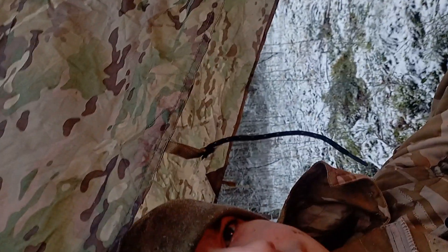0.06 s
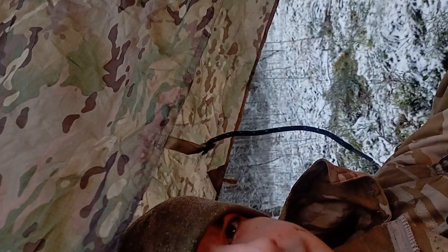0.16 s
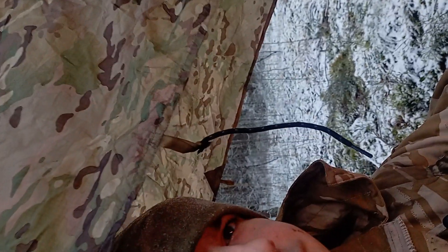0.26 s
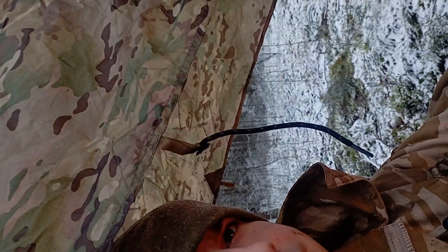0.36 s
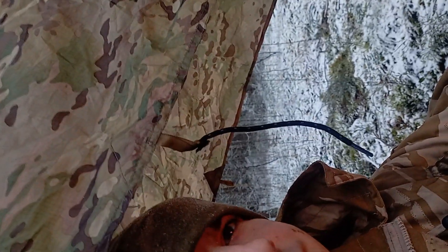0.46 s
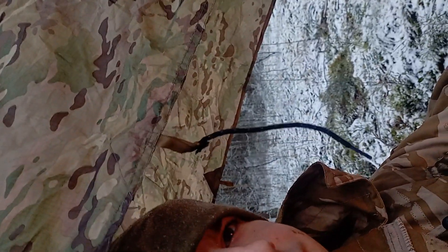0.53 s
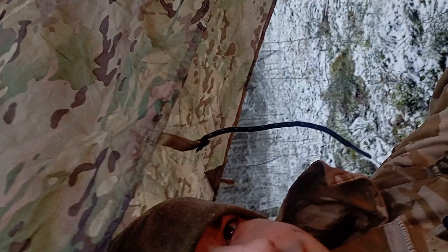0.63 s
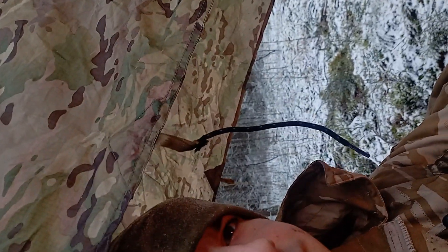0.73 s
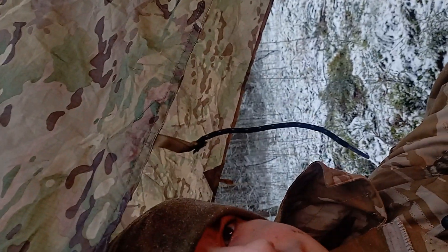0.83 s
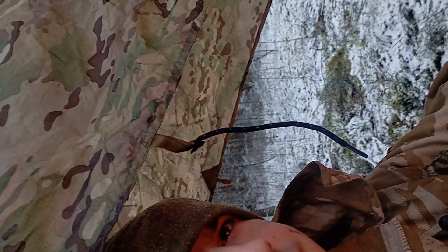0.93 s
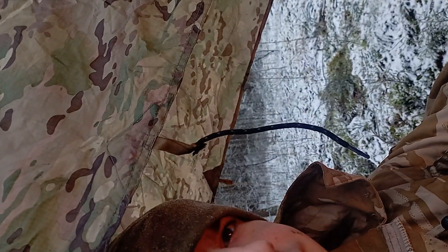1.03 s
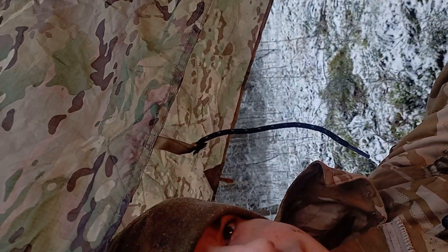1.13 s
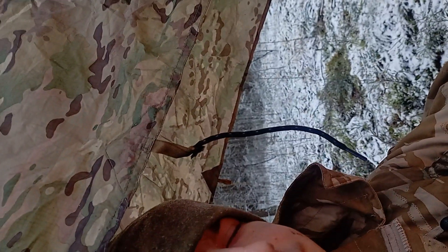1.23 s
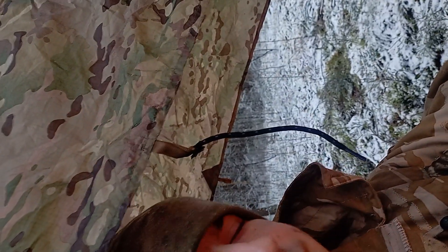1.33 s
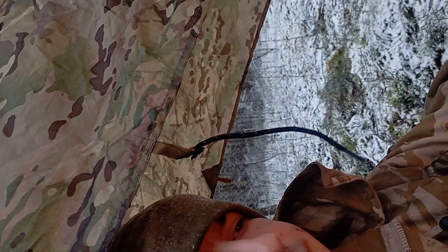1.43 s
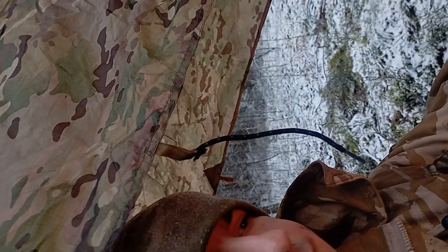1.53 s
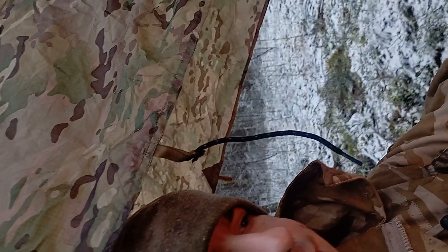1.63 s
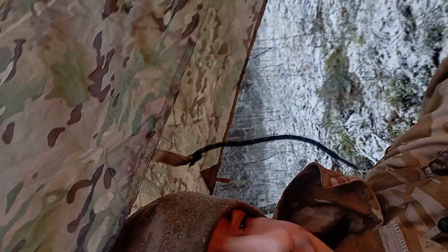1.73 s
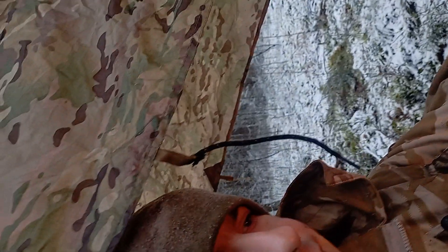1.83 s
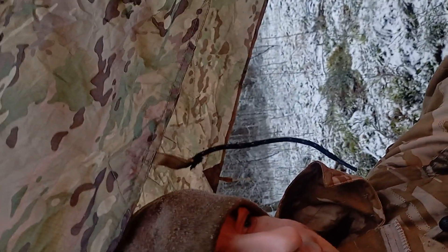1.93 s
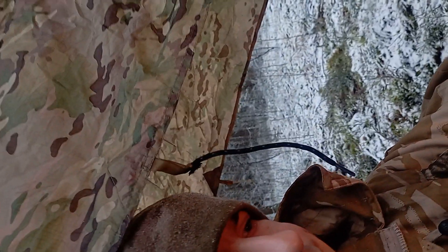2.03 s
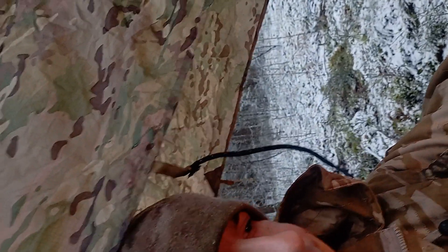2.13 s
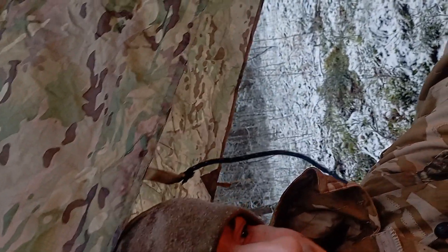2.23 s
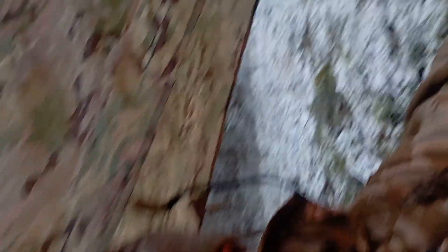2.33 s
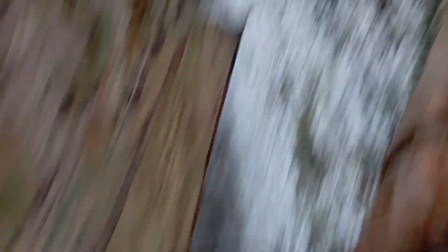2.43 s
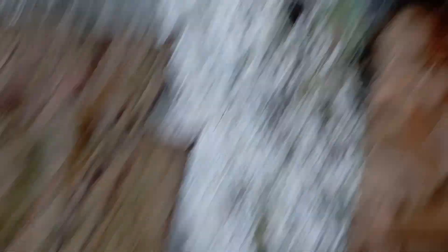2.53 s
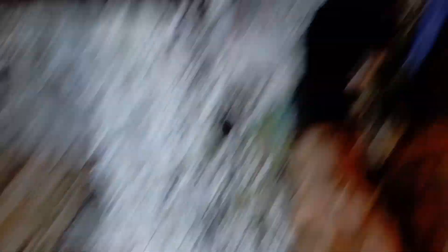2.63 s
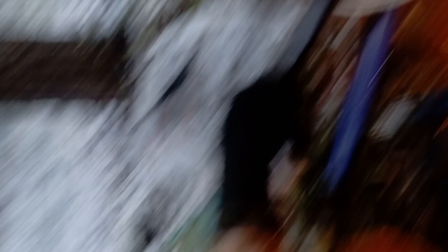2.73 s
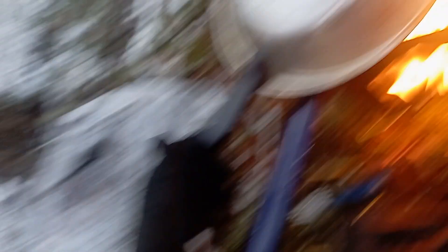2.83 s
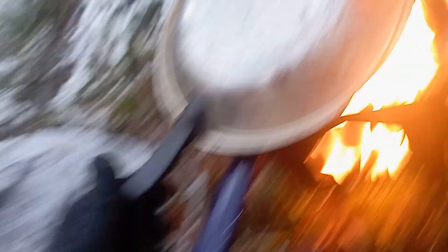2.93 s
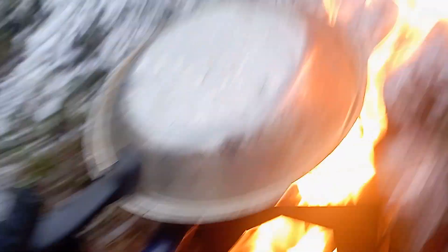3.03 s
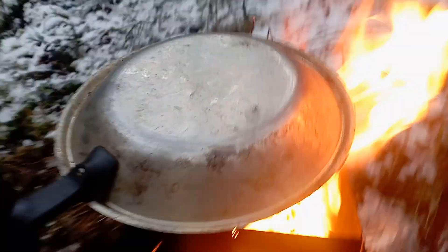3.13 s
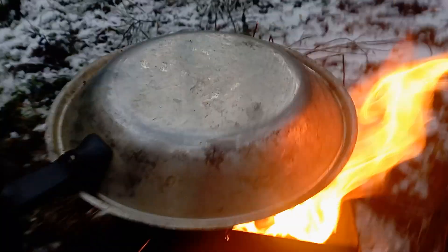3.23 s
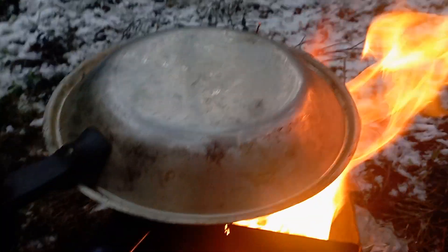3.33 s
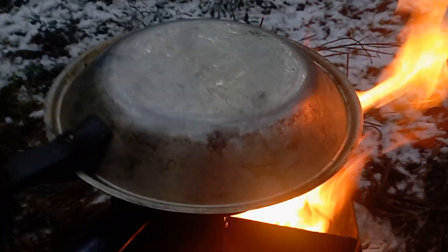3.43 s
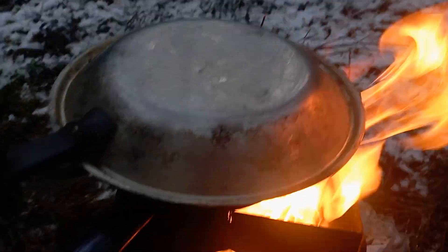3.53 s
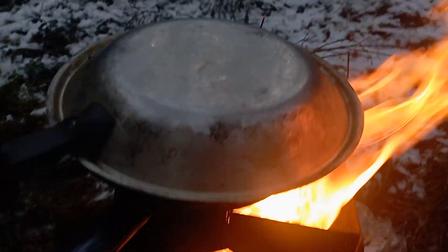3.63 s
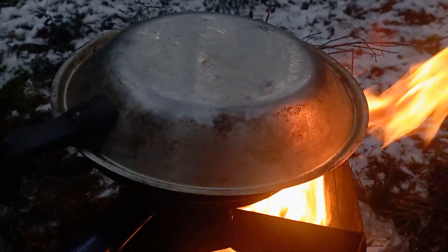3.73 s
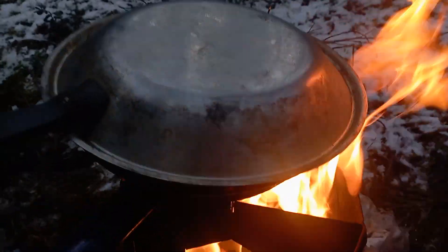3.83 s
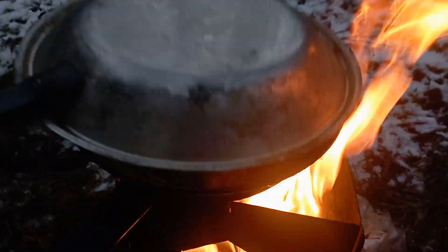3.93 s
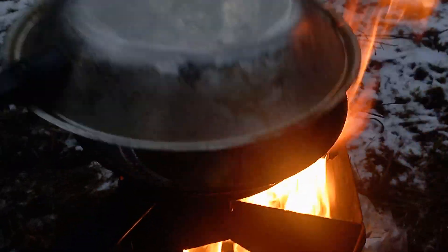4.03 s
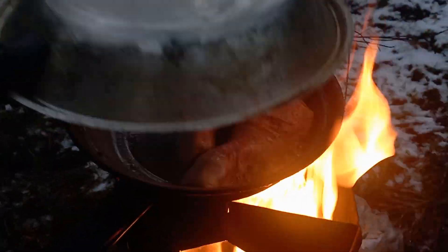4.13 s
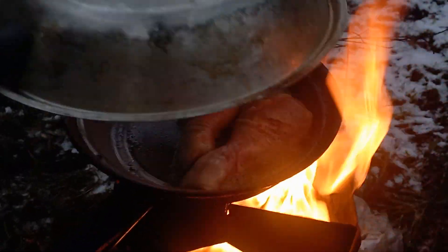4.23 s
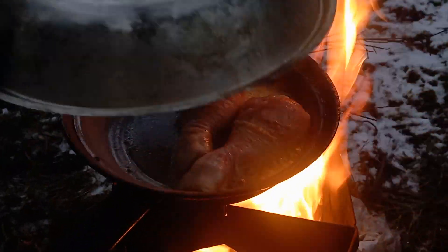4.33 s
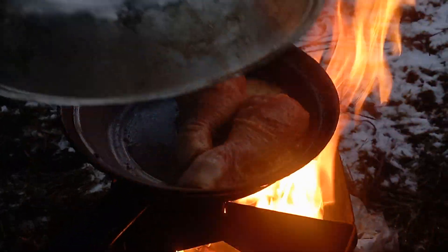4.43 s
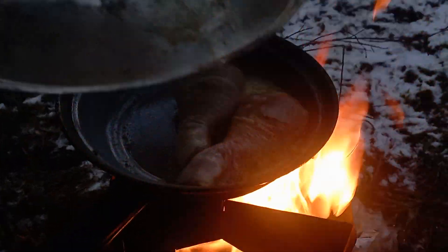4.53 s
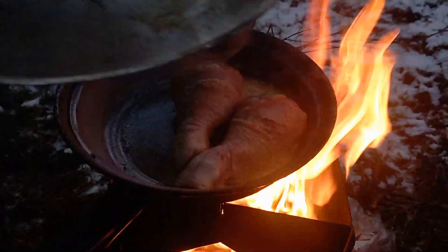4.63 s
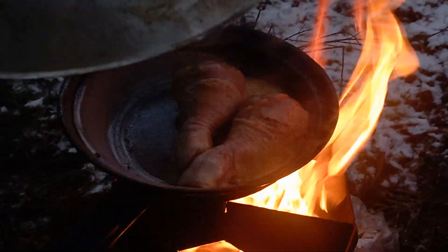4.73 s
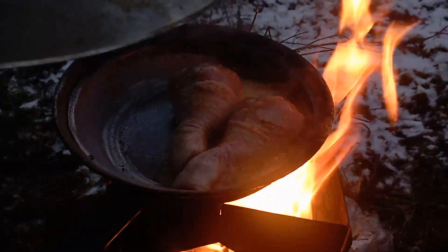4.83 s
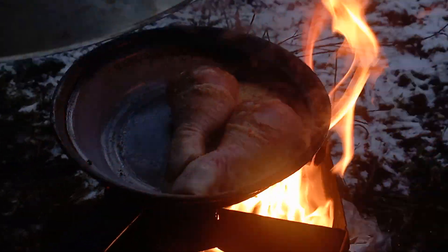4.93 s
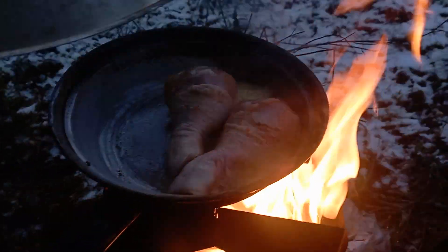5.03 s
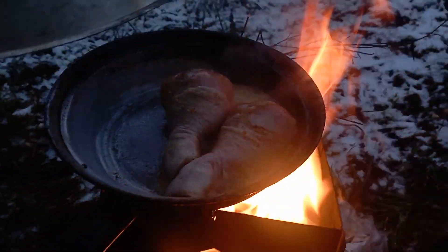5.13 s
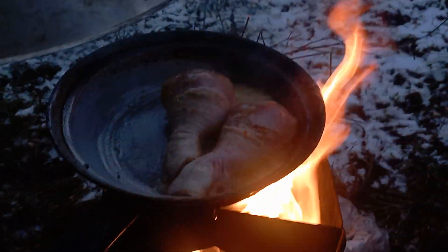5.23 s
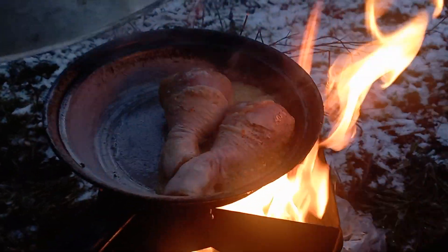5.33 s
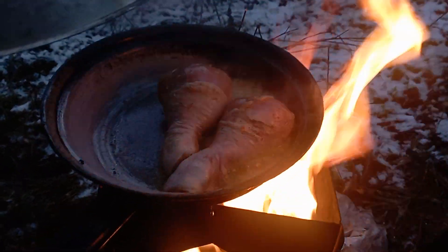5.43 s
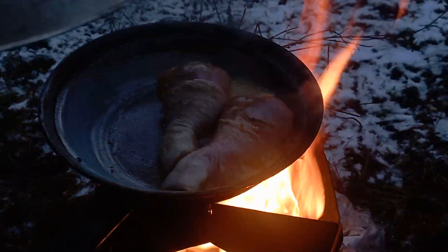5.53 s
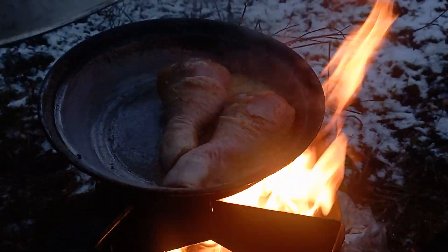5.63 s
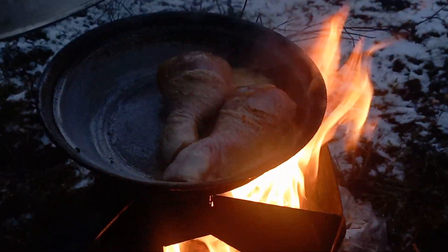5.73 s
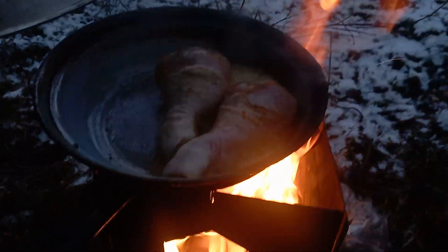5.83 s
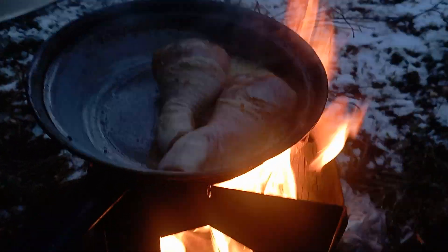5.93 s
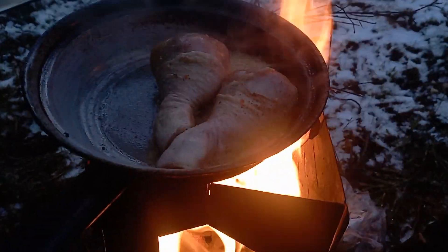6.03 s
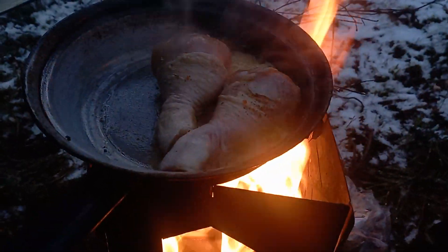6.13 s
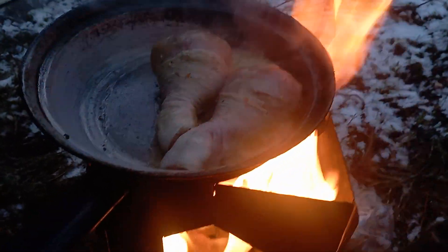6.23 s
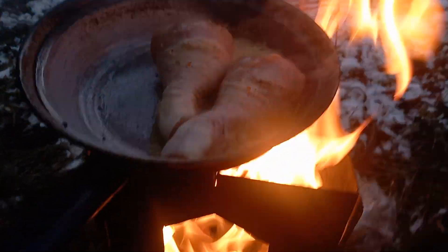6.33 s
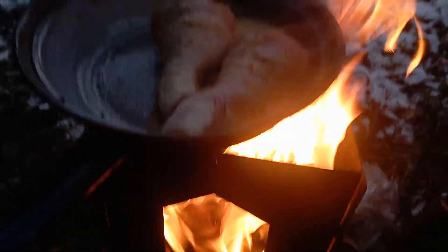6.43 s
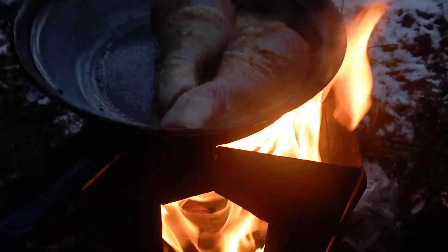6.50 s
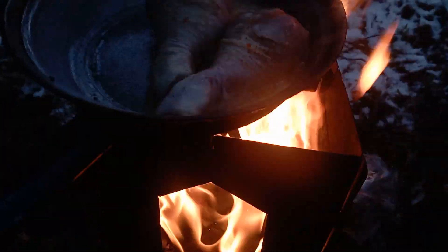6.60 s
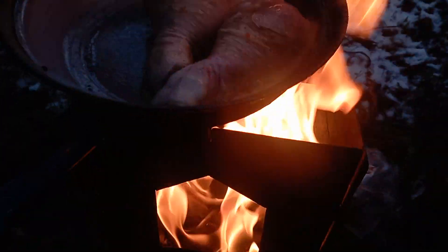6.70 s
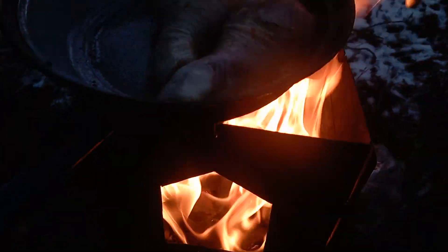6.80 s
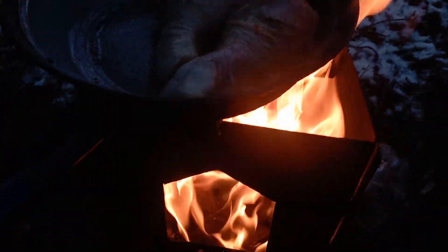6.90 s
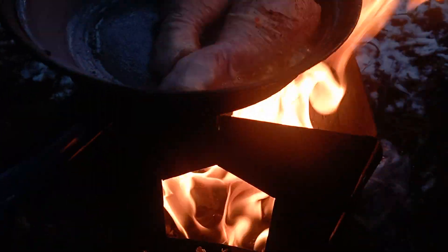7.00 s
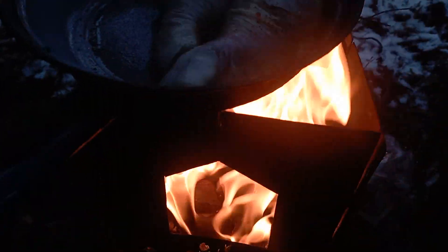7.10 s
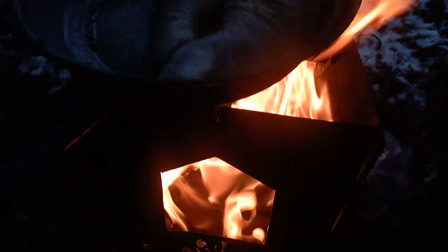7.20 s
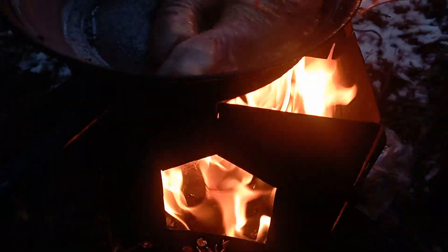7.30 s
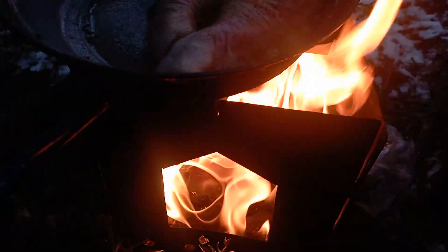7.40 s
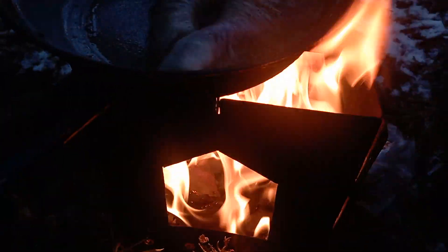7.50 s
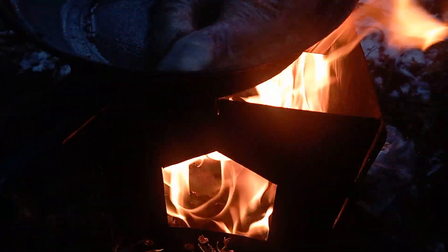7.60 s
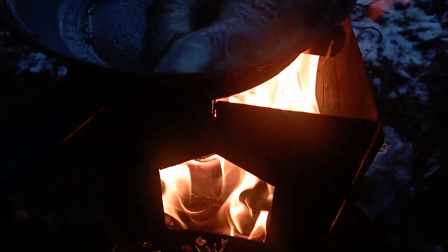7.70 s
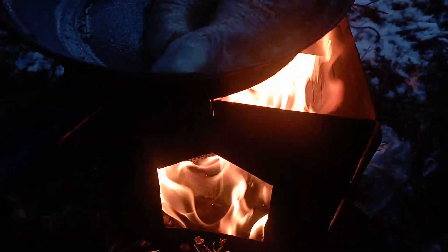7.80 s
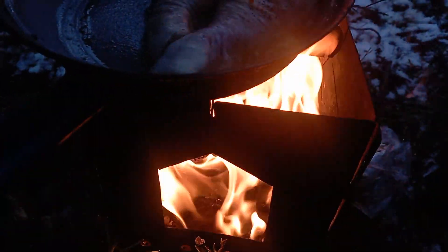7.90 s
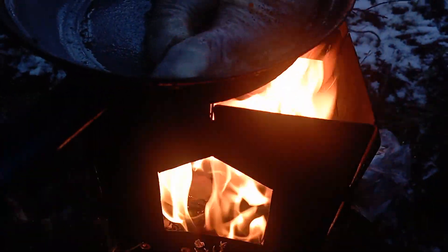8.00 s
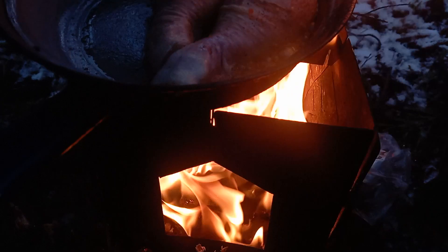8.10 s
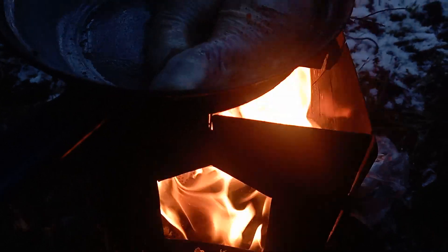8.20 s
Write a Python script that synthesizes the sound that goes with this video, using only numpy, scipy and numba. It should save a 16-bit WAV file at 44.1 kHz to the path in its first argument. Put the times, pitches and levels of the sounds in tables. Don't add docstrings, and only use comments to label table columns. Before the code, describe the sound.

Muffled sizzling under a closed lid outdoors, a sleeve rustle and metal scrape, then bright crackling frying with sharp spits above a low fluttering fire.

```python
import sys
import numpy as np
from scipy import signal
from scipy.fft import rfft, irfft
from scipy.io import wavfile
from scipy.ndimage import uniform_filter1d
from numba import njit

SR = 44100
rng = np.random.default_rng(int(sys.argv[2]) if len(sys.argv) > 2 else 0)


def wav_out(sig):
    wavfile.write(sys.argv[1], SR, np.round(np.clip(np.atleast_2d(sig).T, -1, 1) * 32767).astype(np.int16))


def natural_amplitude(level_db):
    exponent = np.asarray(level_db, float) / 20
    return 10 ** exponent


N = 364001
TIME = np.arange(N) / SR

# t/s, lid opening/0-1, lag of the left port/samples
POSE = [
    (0, 0.02, 12),
    (2.3, 0.03, 11),
    (2.8, 0.04, 1),
    (3.55, 0.06, -7.5),
    (3.85, 0.31, -2),
    (4.25, 1, -3),
    (5.6, 0.97, -6.5),
    (6.2, 1, -3.5),
    (8.25, 0.99, -3.5),
]


def level(x, db):
    return x * natural_amplitude(db) / np.sqrt(np.mean(x ** 2))


def spread(pan_db):
    return natural_amplitude(np.array([pan_db, -pan_db]) / 2)


def curves(table, at=TIME):
    s, *columns = np.transpose(table)
    return [np.interp(at, s, c) for c in columns]


def passband(x, lo_hz, hi_hz, order=2):
    sos = signal.butter(order, [lo_hz, min(hi_hz, 0.45 * SR)], "band", fs=SR, output="sos")
    return signal.sosfilt(sos, x)


def walk(rate):
    hold = int(SR / rate)
    steps = np.repeat(rng.standard_normal(N // hold + 1), hold)
    return uniform_filter1d(uniform_filter1d(steps, hold), hold)[:N]


@njit
def svf(x, hz, width):
    y = np.empty(len(x))
    band, low = 0., 0.
    for i in range(len(x)):
        g = np.tan(np.pi * hz[i] / SR)
        damping = width[i] / hz[i]
        v = (band + g * (x[i] - low)) / (1 + g * (g + damping))
        band = 2 * v - band
        low = low + 2 * g * v
        y[i] = damping * v
    return y


@njit
def rings(start, hz, cycles, size, soft, glide):
    y = np.zeros(N)
    for k in range(len(start)):
        first = int(np.ceil(start[k]))
        pole = (2j * np.pi - np.log(1000) / cycles[k]) * hz[k] / SR
        z = size[k] * np.exp(pole * (first - start[k]))
        step = np.exp(pole)
        bend = np.exp(2j * np.pi * glide * hz[k] ** 2 / (cycles[k] * SR ** 2))
        swell = np.exp(-hz[k] / (soft * SR))
        lack = swell ** (first - start[k])
        for n in range(max(first, 0), min(N, first + int(cycles[k] * SR / hz[k]))):
            y[n] += z.imag * (1 - lack)
            z, step, lack = z * step, step * bend, lack * swell
    return y


def grains(s, hz, cycles, db, pan_db, lag, soft=0.15, glide=0.):
    columns = np.broadcast_arrays(s, hz, cycles, db, pan_db, lag)
    s, hz, cycles, db, pan_db, lag = (1. * v for v in columns)
    cycles = np.maximum(cycles, 1.)
    return np.array([rings(s * SR + side * lag / 2, hz, cycles, natural_amplitude(db + side * pan_db / 2), soft, glide)
                     for side in (1, -1)])


def swarm(count, lo_hz, hi_hz, cycles, spread_db, shut_width, width, surge_db, surge_rate, echo_db,
          soft=0.033, glide=0.):
    s, pitch, bounce = rng.random((count, 3)).T
    spot, shade, length = rng.standard_normal((count, 3)).T
    s = s * N / SR
    hz = lo_hz * (hi_hz / lo_hz) ** pitch
    cycles = cycles * np.exp(0.35 * length)
    db = spread_db * rng.exponential(size=count).clip(0, 5.5)
    db = db + surge_db * np.interp(s, TIME, walk(surge_rate))
    gap, lag = curves(POSE, s)
    wide = shut_width + (width - shut_width) * gap
    direct = grains(s, hz, cycles, db, 1.05 * wide * shade, lag + wide * spot, soft, glide)
    late = s + 0.0003983 + 0.001202 * bounce
    wall = grains(late, hz, cycles, db + echo_db, -5.5, lag - 3 * wide * length, soft, glide)
    return level(direct + wall, 0)


def frying():
    # t/s, fizz/dB, bubbling minus fizz/dB, fizz left minus right/dB, bubbling left minus right/dB
    fry = [(0.0, -54, -3.5, -11, 0), (0.3, -52, -7, -3.0, 1), (1.97, -53, -5.5, -3, -0.5),
           (2.11, -51, -8.5, -3, 0), (2.64, -53, -3.5, -3.5, -6), (2.8, -51, -8, 0, 0),
           (3.01, -47, -5, -4.5, 1), (3.21, -45, -10.5, 4, 1), (3.45, -46, -6, 1.5, 5),
           (3.49, -46, -8, 3, 1.5), (3.77, -40.5, -12, 4.5, 4), (3.83, -37.5, -15.5, 3.5, -2),
           (3.95, -39, -12.5, 4.5, -1), (4.18, -33, -17, 2, -1.0), (4.25, -33.5, -12.5, 1, -3),
           (4.3, -29, -20, 2, -1), (4.34, -31, -13.5, 3.5, -1), (4.46, -30, -19.5, 2, 0),
           (4.5, -31.5, -11, 4.5, -1), (4.55, -29, -19.5, 3, -0.5), (4.64, -30.5, -13.5, 8, -1),
           (5.14, -29.5, -16.5, 6.5, -2), (5.21, -31, -10, 7, -2), (5.24, -30, -18, 8.5, -3),
           (5.35, -32, -13, 7.5, -2), (6.02, -31, -12.5, 8, -1), (6.25, -30.5, -15.5, 6.5, -3),
           (6.32, -31.5, -17, 8, 1), (6.36, -32.5, -9.5, 4, 6), (6.39, -27.5, -20, 5, -2),
           (6.41, -34.5, -9.5, 9, 1), (6.48, -30, -16, 9.5, 0), (6.57, -33.5, -11.5, 7, -1),
           (6.96, -32.5, -9.5, 7, 1.5), (7.03, -34, -12.5, 7, 0.5), (7.65, -32, -12.5, 7, -0.5),
           (7.72, -33, -10.5, 11, 1), (7.81, -31.5, -13, 5.0, 1), (7.83, -32, -12, 7, 0.5),
           (8.2, -35, -10, 7, -1), (8.25, -30, -18, 2, 0.5)]
    fizz_db, rel_db, fizz_pan, bubble_pan = curves(fry)
    fizz = swarm(count=80000, lo_hz=3610, hi_hz=16800, cycles=2.4, spread_db=3.0, shut_width=3.01,
                 width=2.73, surge_db=1.5, surge_rate=14, echo_db=-6)
    bubbles = swarm(count=26000, lo_hz=1570, hi_hz=5520, cycles=7.4, spread_db=3.0, shut_width=1.54,
                    width=3.35, surge_db=2.0, surge_rate=14, echo_db=-7, soft=0.2, glide=0.22)
    simmer = swarm(count=5000, lo_hz=422, hi_hz=1420, cycles=6.4, spread_db=3.5, shut_width=1.5,
                   width=2.0, surge_db=3.5, surge_rate=9, echo_db=-15, soft=0.35, glide=0.12)
    fizz = level(passband(fizz, 3800, 24400), 0) * natural_amplitude(fizz_db - 5.5) * spread(fizz_pan)
    bubbles = level(passband(bubbles, 1710, 8400), 0) + level(simmer, -20)
    bubbles = bubbles * natural_amplitude(fizz_db + rel_db + 2) * spread(bubble_pan)
    return under_lid(fizz + bubbles + shut_pops())


def shut_pops():
    # t/s, peak/dB, f/Hz
    bursts = [(0.193, -47, 1280), (0.2633, -45, 1280), (0.3506, -54, 3000), (0.4389, -44, 2850),
              (0.6439, -50, 2870), (0.832, -47, 2920), (1.0694, -51, 2910), (1.1892, -45, 2900),
              (1.352, -41, 2940), (1.5359, -46, 2940), (1.7994, -55, 3210), (2.164, -48, 2920),
              (2.957, -31, 2910), (2.983, -34, 1990), (3.0425, -43, 2700), (3.3725, -44, 1300),
              (3.3992, -40, 1980), (3.6466, -43, 2230)]
    s, db, hz = np.transpose(bursts)
    return grains(s, hz, 8, db + 5.5, -3.0, curves(POSE, s)[1], soft=0.32)


def under_lid(x):
    # f/Hz, width/Hz, level/dB
    air_modes = [(490, 160, -1), (1300, 64, 5), (2080, 41, -9), (2920, 118, 0.5), (3650, 210, -6),
                 (4450, 390, -3), (5225, 120, -2), (5820, 480, -2), (6980, 72, 0.5), (7360, 100, -2.5),
                 (8450, 530, -3.5), (9240, 160, 0.5), (10900, 550, -0.5), (11120, 340, 2),
                 (14000, 2540, 6.5)]
    gap = curves(POSE)[0].clip(0, 1)
    modes = 0
    for k, (hz, width, db) in enumerate(air_modes):
        mode = np.array([svf(c, hz + 450 * gap, width * (1 + 4 * gap)) for c in x])
        modes = modes + (-1) ** k * natural_amplitude(db) * mode
    shut = natural_amplitude(6.5) * modes + natural_amplitude(-21) * x
    return np.sqrt(1 - gap) * shut + np.sqrt(gap) * x


def big_bubbles():
    # t/s, peak/dB, f/Hz, left minus right/dB, length/cycles
    bursts = [(4.1287, -30.5, 2040, -3.0, 7), (4.2393, -34, 2550, -2.0, 5.5),
              (4.3434, -39, 2220, -2.0, 5.7), (4.3674, -28, 3800, 2, 5.5), (4.498, -23.5, 2650, -4.5, 7.7),
              (4.721, -30, 2190, -2.5, 5), (4.7973, -27.5, 2500, -3, 6.2), (5.2457, -32, 2770, -4, 5),
              (5.3192, -33, 3610, 3, 5), (5.3541, -29, 2990, 8, 5), (5.376, -28, 2470, -2, 5.8),
              (5.4109, -30, 3120, -0.5, 5), (5.438, -24.5, 2780, 6, 5), (5.5481, -27, 3840, -2, 5),
              (5.774, -23.5, 2860, 1.0, 4.3), (5.8909, -26, 3520, 1.5, 5), (6.0013, -29, 2770, 2.0, 5),
              (6.024, -35, 2810, 0.0, 5), (6.05, -30.5, 2720, 1.5, 4.6), (6.1118, -27, 3640, 5, 4.6),
              (6.1937, -27, 3700, 2.0, 5), (6.2354, -22.5, 3560, 5, 5.9), (6.266, -26, 3690, 4.0, 5.4),
              (6.3576, -22.5, 3240, 3.0, 6.5), (6.5853, -26.5, 3180, 4, 3.9), (6.6137, -33, 2890, 0.5, 4.5),
              (6.6322, -28, 3850, 4, 5.5), (6.857, -32, 2830, 4, 4.6), (6.8953, -28, 3140, -2, 6.1),
              (6.943, -19.5, 2110, 1, 4.2), (7.099, -27, 3700, 2.0, 4.7), (7.163, -28, 2940, 1.5, 5),
              (7.267, -32, 2820, 1.5, 6.7), (7.406, -36, 3000, 1.5, 5), (7.4895, -25, 3920, 6, 4.3),
              (7.5221, -25, 2840, 1, 6), (7.5564, -30, 2900, -1, 5.4), (7.6045, -29, 1670, -2.5, 5.5),
              (7.9135, -26, 3650, 4, 5), (7.9791, -34, 3640, 5, 5), (7.9961, -29.5, 2820, 3, 4.4),
              (8.0829, -36, 2080, 0.5, 5.5)]
    s, db, hz, pan_db, cycles = np.transpose(bursts)
    lag = curves(POSE, s)[1]
    body = grains(s, hz, 3 * cycles, db + 10, pan_db, lag, soft=0.7, glide=0.13)
    return body + grains(s, 1.4 * hz, 0.73 * cycles, db - 14.5, pan_db, lag, soft=0.28)


def spits():
    # t/s, peak/dB, left minus right/dB, thud re peak/dB
    ticks = [(2.235, -26, -4.0, -30), (3.8067, -26, 3, -30), (4.2756, -19.5, 1.0, -30),
             (4.3, -17, 0.5, -30), (4.368, -20, -1, -30), (4.451, -14, -4, -30), (4.4832, -26.5, 2.0, -30),
             (4.55, -12, 1.5, -30), (4.6526, -16, 3, -30), (4.9307, -24, 1, -30), (4.9686, -17, 3.0, -28),
             (4.9791, -20, 6.0, -30), (5.0492, -19, 2, -30), (5.1253, -20, 2, -30), (5.245, -14, 13.5, -26),
             (5.432, -16, 5.0, -30), (5.5717, -17, 6.5, -30), (5.6925, -13, 4, -30), (5.792, -13, 3, -27),
             (5.8674, -25, 6.5, -33), (5.9843, -25, 6.5, -30), (6.1509, -18, 6.5, -30),
             (6.2133, -20, 1, -30), (6.3654, -22, 4.0, -30), (6.3899, -17, 2.0, -30), (6.443, -20, 2, -30),
             (6.4656, -15, 4, -30), (6.6408, -26, 4, -32), (6.7825, -20, 2, -30), (6.9426, -24, 5.0, -30),
             (7.283, -19, 6.0, -30), (7.398, -27, 2, -30), (7.5492, -22, 4.5, -30), (7.6291, -25, 4.0, -30)]
    s, db, pan_db, thud_db = np.transpose(ticks)
    lag = curves(POSE, s)[1]
    tick = grains(s + 0.00081, 9500, 11.0, db - 3, pan_db, lag)
    return tick + grains(s + 0.00056, 3600, 1.9, db + thud_db, pan_db, lag)


def wood_cracks():
    # t/s, peak/dB, f/Hz, left minus right/dB, length/cycles
    thuds = [
        (5.2458, -25, 380, 28.5, 0.77),
        (6.9435, -23, 1000, -6, 2),
        (7.6045, -44, 560, -1, 1.7),
        (2.235, -42, 900, -6, 1.8),
    ]
    s, db, hz, pan_db, cycles = np.transpose(thuds)
    return grains(s, hz, cycles, db + 8, pan_db, 0, soft=0.058)


def fire():
    # t/s, flutter/dB, roar minus flutter/dB
    flames = [(0.0, -67.5, -1), (0.18, -60.5, -5), (0.23, -52.5, -9.5), (0.62, -62, -8), (0.69, -53, -12),
              (0.82, -63, -4), (1.88, -57.5, -10), (2.0, -66, -3), (2.14, -52.5, -15), (2.34, -64, -3),
              (2.5, -49.5, -8), (2.57, -58.5, 5.5), (2.8, -51.5, -3), (2.82, -57.5, 1), (2.96, -49, -14),
              (3.06, -60, -8), (3.13, -44, -4), (3.33, -59, -5), (3.47, -50, -5), (3.51, -54, -8),
              (3.56, -51, -19), (3.58, -48, 11.5), (3.7, -57, -10), (3.81, -47, -4), (3.97, -62, 0),
              (4.04, -48, -10), (4.11, -56.5, 0.5), (4.96, -50.5, -13), (5.01, -62, -3), (5.08, -52, -11.5),
              (5.93, -60, -7.5), (5.95, -63, -1), (6.2, -57, -5), (6.34, -69, 0), (6.5, -54.5, -13),
              (6.59, -60, -6), (6.87, -50, -16), (6.89, -66, -10), (6.94, -54, -8), (7.01, -61, -6),
              (7.1, -50, -12), (7.14, -64, -4), (7.51, -56, -13), (7.74, -53, 4.5), (7.86, -57.5, 5),
              (8.0, -50, -9.5), (8.09, -67, -4), (8.16, -54, -10), (8.25, -71, -3)]
    # t/s, peak/dB, f/Hz
    gusts = [(0.239, -47, 88), (0.296, -42, 159), (0.681, -41, 103), (1.171, -49, 96.9), (1.572, -43, 127),
             (1.719, -46, 172), (1.821, -46, 119), (2.77, -40, 116), (2.784, -39.5, 165), (3.409, -43, 99),
             (3.443, -34.5, 132), (3.741, -42, 150), (4.026, -41, 156), (4.807, -43, 130),
             (5.796, -45, 107), (6.841, -42, 110), (7.069, -47, 110)]
    flutter_db, roar_db = curves(flames)
    s, pitch, shade = rng.random((1400, 3)).T
    db = 3.6 * rng.exponential(size=len(s)).clip(0, 3.5)
    flutter = grains(s * N / SR, 70 * 3.2 ** pitch, 4.35, db, 6 * shade - 4.8, 0, soft=0.73)
    s, pitch, shade = rng.random((3000, 3)).T
    db = 3.0 * rng.exponential(size=len(s)).clip(0, 3.5) - 6 * pitch
    roar = grains(s * N / SR, 230 * 2.6 ** pitch, 4.8, db, 9 * shade - 4.7, 0, soft=0.34)
    s, db, hz = np.transpose(gusts)
    puffs = grains(s + 0.0041, hz, 4.6, db + 11.5, -2.4, 0, soft=0.56)
    return level(flutter, -1.36) * natural_amplitude(flutter_db) + level(roar, -3.5) * natural_amplitude(flutter_db + roar_db) + puffs


def lid():
    # t/s, level/dB, f/Hz, t60/s
    bumps = [(3.107, -37, 140, 0.093), (3.113, -41, 292, 0.083), (3.132, -37, 199, .07),
             (3.146, -40, 334, 0.067), (3.160, -43, 260, .09), (3.172, -46, 391, 0.12),
             (3.5795, -25.5, 340, 0.055), (3.5853, -34.5, 385, 0.18), (3.589, -44, 900, 0.026),
             (7.715, -38, 332, .06), (7.885, -45, 396, 0.065)]
    s, db, hz, t60 = np.transpose(bumps)
    return grains(s, hz, hz * t60, db + 1, 2.1, 0, soft=0.38)


def sleeve():
    # t/s, level/dB
    rustle = [
        (2.3, -80),
        (2.42, -64),
        (2.55, -55.5),
        (2.68, -55.5),
        (2.76, -60),
        (2.9, -73),
    ]
    hiss = passband(rng.standard_normal((2, N)), 640, 6500, order=1) * natural_amplitude(5.2 * walk(60))
    return level(hiss, 0) * natural_amplitude(curves(rustle)[0])


def air():
    # f/Hz, level per Hz/dB
    spectrum = [(30, -42), (100, 3), (300, -6.5), (700, -20.5), (2000, -43), (6000, -21), (15000, -41.5)]
    hz, db = np.transpose(spectrum)
    f = np.fft.rfftfreq(N, 1 / SR) + 1
    mid, side = rfft(rng.standard_normal((2, N))) * natural_amplitude(np.interp(np.log(f), np.log(hz), db))
    side = side * (f / 900).clip(0.15, 1)
    return level(irfft([mid + side, mid - side], N), -69)


def scene():
    pan = frying() + big_bubbles() + spits()
    return pan + wood_cracks() + fire() + lid() + sleeve() + air()


def top_cut(x):
    return signal.sosfilt(signal.butter(12, 16010, fs=SR, output="sos"), x)


def record(dry):
    # f/Hz, width/Hz, lift/dB
    ports = [
        (9840, 2220, 13),
        (8870, 2310, 11.5),
    ]
    # lowest f/Hz, highest f/Hz
    mic_hz = (62, 15750)
    ones = np.ones(N)
    wet = np.array([c + natural_amplitude(db) * svf(c, hz * ones, width * ones) for c, (hz, width, db) in zip(dry, ports)])
    wet = signal.sosfilt(signal.butter(3, mic_hz[0], "high", fs=SR, output="sos"), wet)
    wet = signal.sosfilt(signal.ellip(10, 0.2, 70, mic_hz[1], fs=SR, output="sos"), wet)
    return top_cut(wet)


dry = scene()
out = record(dry)
wav_out(out)
```